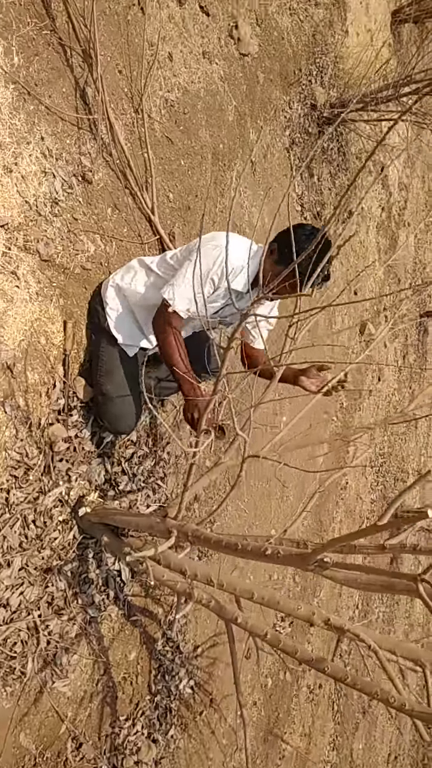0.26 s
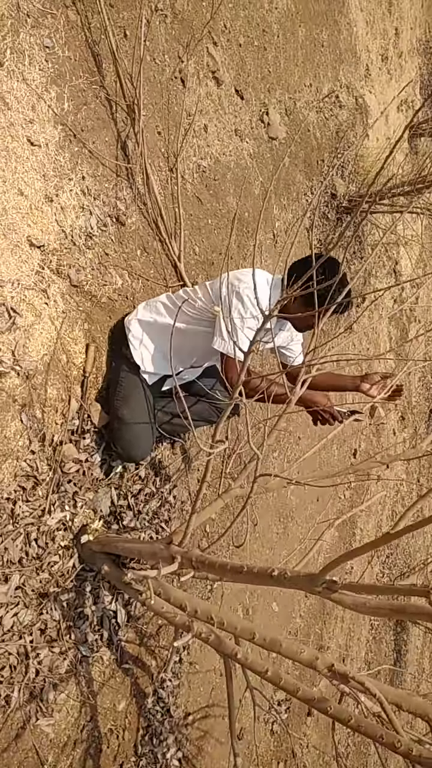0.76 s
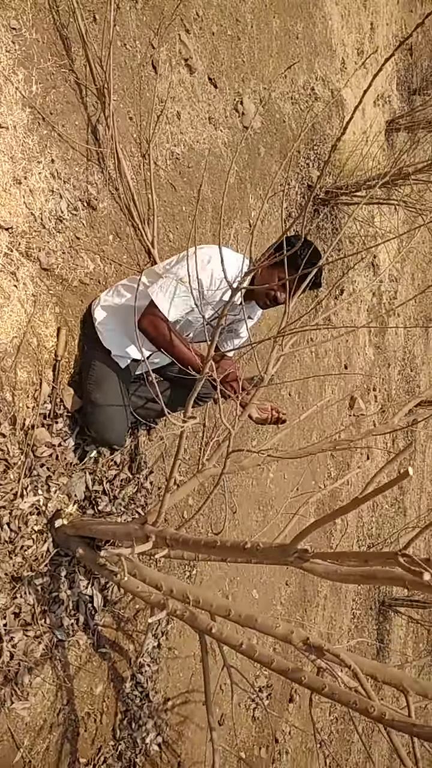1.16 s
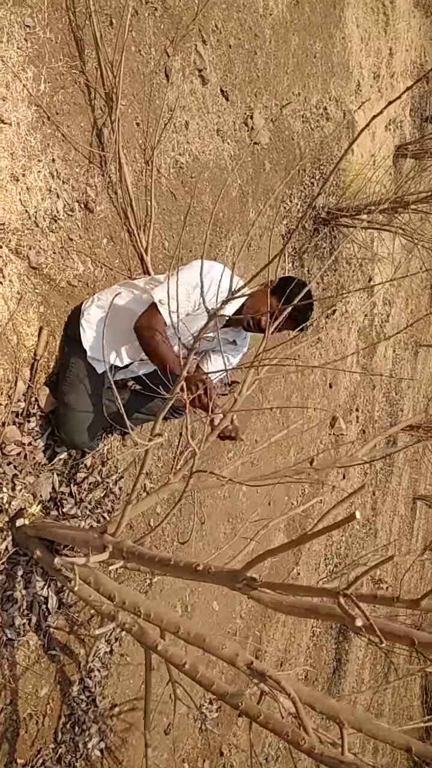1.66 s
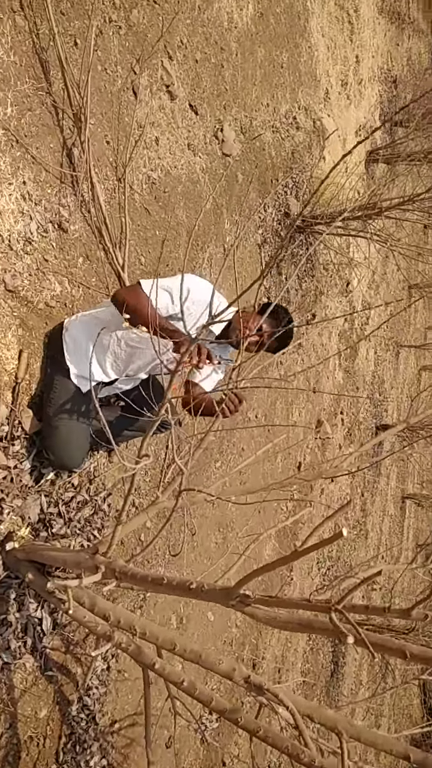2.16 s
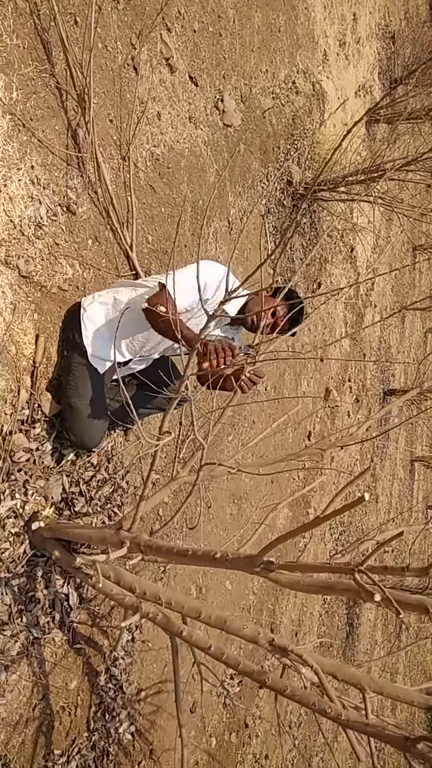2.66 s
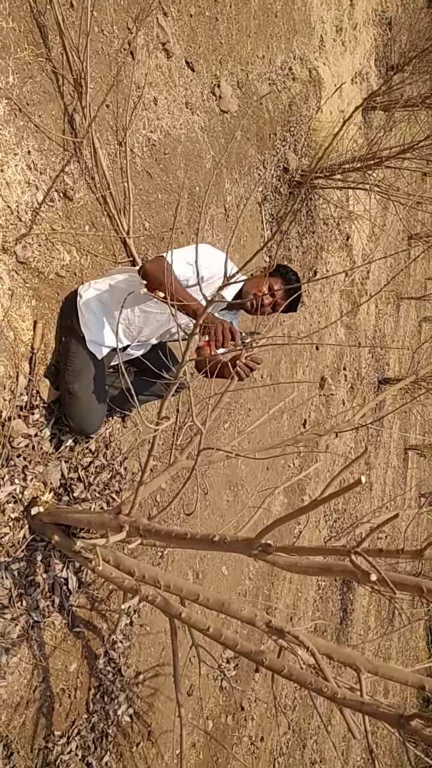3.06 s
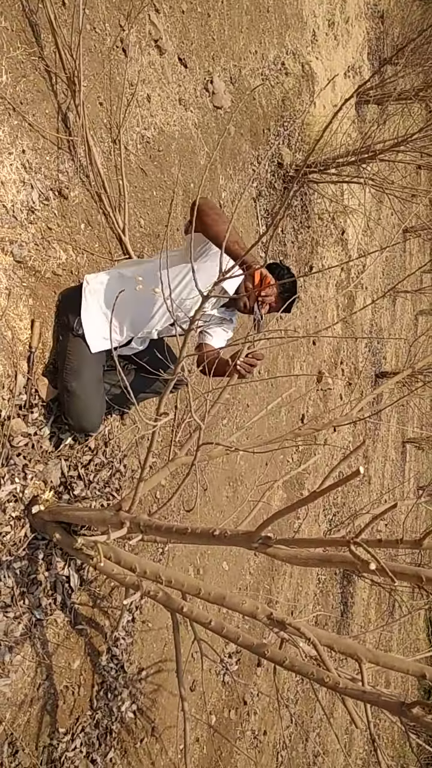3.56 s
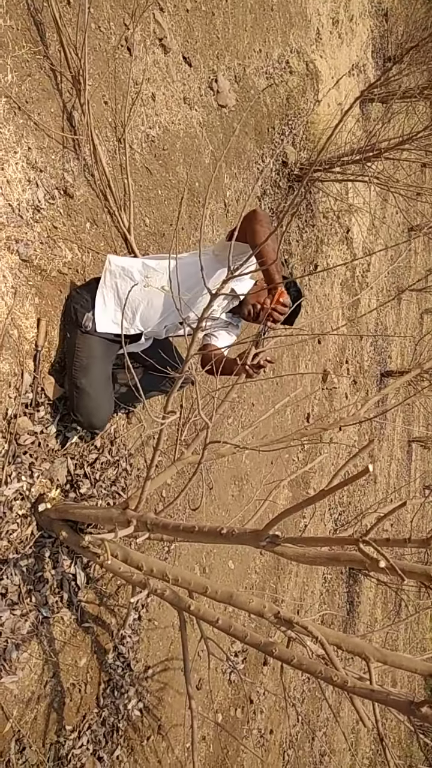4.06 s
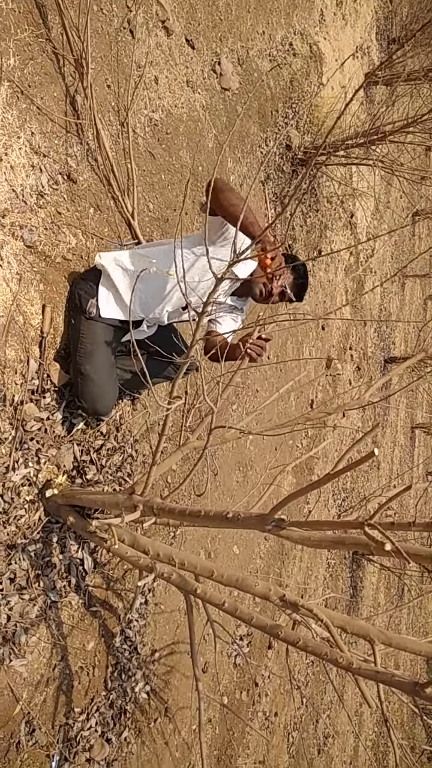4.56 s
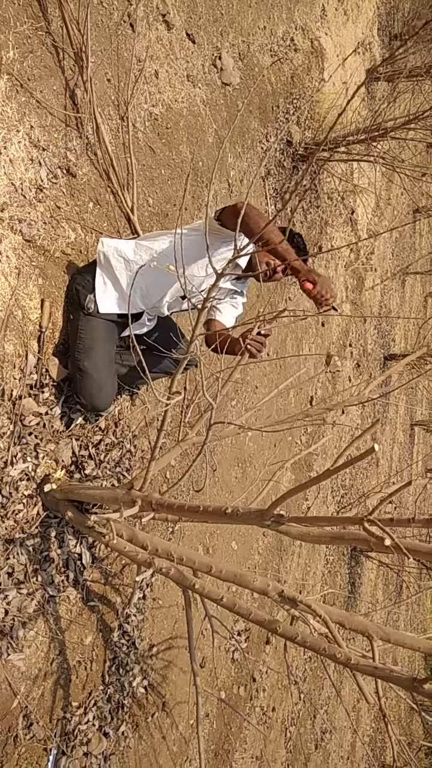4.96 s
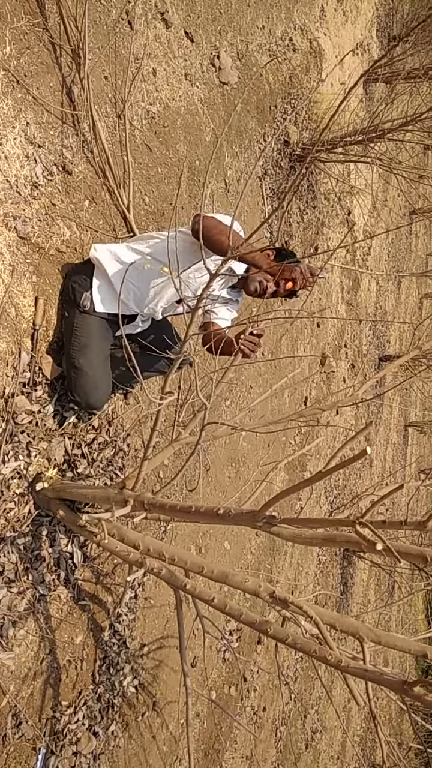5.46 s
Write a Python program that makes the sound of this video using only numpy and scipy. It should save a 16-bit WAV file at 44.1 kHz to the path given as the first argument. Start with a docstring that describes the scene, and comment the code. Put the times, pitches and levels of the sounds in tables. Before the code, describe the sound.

Close outdoor pruning: crisp woody clips with a metallic ring, brittle branch rustle and ticks, low wind buffeting mostly on the left.

```python
"""Pruning a bare tree in the wind

Hand shears snap through dry twigs of an orchard tree; shocks ring their modes and noise bursts crack the wood.
Shaken branches rustle as dense grains of noise, spread wide; twigs tick, wood knocks, a squeak glides up.
Wind buffets the two ports of a small microphone, mostly the left one: lumpy noise and puffs of a few cycles,
strong at first and then mostly single puffs, over a faint hiss of open air."""
import sys
import numpy as np
from scipy import signal
from scipy.fft import rfft, irfft
from scipy.io import wavfile
from scipy.ndimage import uniform_filter1d

SR = 44100
rng = np.random.default_rng(int(sys.argv[2]) if len(sys.argv) > 2 else 0)


def transcribe(u):
    """Save the signal u as a 16-bit wav file named by the first command-line argument.

    u: samples, shape (n,) or (channels, n), limited to [-1, 1]; the rate is SR.
    q: integer samples, one column per channel.
    """
    v = np.clip(np.atleast_2d(u).T, -1, 1)
    q = np.round(v * 32767).astype(np.int16)
    wavfile.write(sys.argv[1], SR, q)


N = 251811
RISE_S = 0.0003  # attack of a break or tick


def amp(db):
    """Amplitude of a level in dB."""
    return 10 ** (np.asarray(db) / 20)


def evened(x):
    """Scales x to unit RMS."""
    return x / np.sqrt(np.mean(x ** 2) + 1e-20)


def read(points, hz):
    """Reads a spectrum between its points on a logarithmic pitch scale."""
    f, value = np.transpose(points)
    return np.interp(np.log(hz + 1), np.log(f + 1), value)


def along(rows, t):
    """Glides each column of a table through the times in its first column."""
    s, *columns = np.transpose(rows)
    return [np.interp(t, s, c) for c in columns]


def add(mix, s, sound, early=0):
    """Adds a sound in place, its sample number `early` falling at s seconds."""
    start = round(s * SR) - early
    sound = sound[..., max(-start, 0):]
    part = mix[..., max(start, 0):][..., :sound.shape[-1]]
    part += sound[..., :part.shape[-1]]


def coloured(x, points):
    """Filters x by a spectrum in dB."""
    return irfft(rfft(x) * amp(read(points, np.fft.rfftfreq(len(x), 1 / SR))), len(x))


def lumps(size):
    """Slow chance of unit strength, changing over about size samples."""
    return evened(uniform_filter1d(uniform_filter1d(rng.standard_normal(N), size), size))


def peaked(t, s, db, rise_db_s, fall_db_s):
    """Power that climbs to a peak at s and falls away, both at a steady rate in dB."""
    return amp(db - np.maximum(rise_db_s * (s - t), fall_db_s * (t - s))) ** 2


def shares(left_over_right_db):
    """Gains of two unrelated ports whose mean power is 2, split by the level difference."""
    ratio = amp(left_over_right_db)
    return 2 * np.array([ratio, np.ones_like(ratio)]) / np.sqrt(1 + ratio ** 2)


# breeze under the puffs: time_s, level_db, left_over_right_db
BREEZE_COURSE = [(0.0, -25.5, 19.5), (0.57, -24, 28), (0.75, -29.5, 18), (0.86, -49, -13),
                 (1.02, -38, 41.5), (1.56, -63.5, -4), (1.65, -37, 37), (1.81, -49, -18),
                 (2.35, -58.5, -24), (2.42, -50, 11), (2.8, -58.5, -3), (2.86, -58, -42.5),
                 (3.01, -49.5, 11), (3.08, -68.5, -5), (4.07, -63, 31.5), (4.23, -67.5, -19.5),
                 (5.36, -57.5, 40), (5.71, -48, 14)]
# single puffs at the microphone: start_s, level_db, pitch_hz, left_over_right_db
WIND_PUFFS = [(0.026, -16, 258, 41), (0.092, -16.5, 198, 21), (0.127, -12.5, 266, 36),
              (0.218, -14, 276, 30), (0.289, -15, 246, 45), (0.325, -15, 172, 39), (0.345, -25.5, 273, 38),
              (0.39, -19.5, 240, 31), (0.445, -18.5, 312, 36), (0.492, -6.5, 212, 40),
              (0.525, -17, 211, 36), (0.549, -14.5, 197, 37), (0.567, -16, 268, 37), (0.613, -11, 310, 21),
              (0.631, -5, 233, 33), (0.711, -18, 225, 37), (0.824, -23, 147.5, 28), (0.909, -18, 169, 37),
              (1.003, -25.5, 139, 30), (1.07, -38, 140, 22), (1.117, -19.5, 146.6, 32),
              (1.156, -21.5, 171, 22), (1.206, -20.5, 152, 29), (1.234, -20.5, 188.3, 29),
              (1.36, -35, 149, 31), (1.66, -26.5, 155.5, 15.5), (1.872, -38.5, 153, -2),
              (2.281, -35, 190, -50), (2.317, -27, 165.3, -45.5), (2.616, -24.5, 178.7, 47),
              (2.684, -39.5, 167, 16), (2.709, -29, 150, 24), (2.844, -29, 157, -24), (2.85, -21, 190, -33),
              (2.97, -30, 138.7, 29), (3.696, -47, 167, 30), (3.756, -39, 150.8, 44),
              (3.936, -39, 124.8, 45.5), (4.023, -33.5, 158, 29.5), (4.05, -37, 143.7, 28),
              (4.332, -34.5, 153.9, -18.5), (4.716, -28, 137.7, -19.5), (4.919, -25.5, 170.4, 13),
              (4.943, -29, 139, 20), (4.986, -27.5, 151, 22), (5.217, -37, 151.7, 38.5),
              (5.431, -36.5, 154.5, 54.5), (5.568, -40, 150, 29.5), (5.634, -27, 151, 30)]
SWELL_DB, SWELL_LAW = -45, 0.94  # peak for a puff listed at -31 dB, dB gained per dB of puff
SWELL_RISE_DB_S, SWELL_FALL_DB_S = 650, 450


def gusting():
    """Turbulence gain at each port: the breeze plus a swell of power on the side of each puff."""
    t = np.arange(0, N + 64, 64) / SR
    level_db, side_db = along(BREEZE_COURSE, t)
    power = (amp(level_db) * shares(side_db)) ** 2
    for s, db, _, side_db in WIND_PUFFS:
        swell_db = SWELL_DB + SWELL_LAW * (db + 31.0)
        swell = peaked(t, s + 0.01, swell_db, SWELL_RISE_DB_S, SWELL_FALL_DB_S)
        power = power + shares(side_db)[:, None] ** 2 * swell
    return [np.interp(np.arange(N) / SR, t, np.sqrt(port)) for port in power]


SHARP, SHARP_PER_DB = 0.3, 0.06  # overtone against the one below for a puff listed at -22 dB; rise per dB


def puff_of_wind(db, hz, side_db):
    """A few wavering cycles of pressure; harder puffs have stronger overtones."""
    t = np.arange(3000) / SR
    attack = np.minimum(t / 0.0046, 1)
    shape = (2.16 * np.exp(-((t - 0.007) / 0.0055) ** 2) + 0.15 * np.exp(-t / 0.016)) * attack
    wobble = uniform_filter1d(rng.standard_normal((2, len(t))), size=120, axis=1)
    turn = 2 * np.pi * (hz * np.cumsum(1 + 1.4 * wobble, axis=1) / SR)
    # the wave crests near the height of the puff
    turn = turn - turn[:, [300]] + rng.normal(0, 0.5, (2, 1))
    sharp = np.clip(SHARP + SHARP_PER_DB * (db + 22), 0, 0.6)
    wave = sum(sharp ** k * np.exp(-k * t / 0.011) * np.cos((k + 1) * turn) for k in range(6))
    return amp(db - 9.5) * shares(side_db)[:, None] * rng.choice([-1, 1]) * shape * wave


# spectrum of strong wind at the microphone: pitch_hz, level_db
STRONG_WIND = [(12, -56.5), (20, -29), (59, -35), (141, 0), (213, -0.5), (360, -5), (630, -26), (755, -32),
               (1500, -58), (1950, -79)]
# spectrum of light wind at the microphone: pitch_hz, level_db
LIGHT_WIND = [(12, -39.5), (20, -28.5), (59, -12.5), (156, -2), (258, -15.5), (386, -39), (505, -72),
              (700, -77.5), (910, -103)]


def wind():
    """Lumpy turbulence, unrelated at each port and brighter when strong, with single puffs on top."""
    gain = gusting()
    out = np.zeros((2, N))
    for port in range(2):
        noise = rng.standard_normal(N)
        lumpy = gain[port] * amp(5.3 * lumps(size=260) - 4)
        strong = np.clip((20 * np.log10(lumpy) + 52) / 30, 0, 1)
        strong_noise = evened(coloured(noise, STRONG_WIND))
        light_noise = evened(coloured(noise, LIGHT_WIND))
        out[port] = lumpy * (strong * strong_noise + (1 - strong) * light_noise)
    for s, *row in WIND_PUFFS:
        add(out, s, puff_of_wind(*row))
    return out


AIR_DB = -84


def air():
    """Faint steady hiss of the open air above the bass, unlike at each port."""
    tone = [(300, -28), (600, -3.5), (3600, -5), (4700, 4.5), (9000, -19.5)]
    return amp(AIR_DB) * np.array([evened(coloured(port, tone)) for port in rng.standard_normal((2, N))])


# branches are shaken, swing up and settle: peak_s, hiss_level_db, scraping_level_db, build_up_s, hiss_t60_s
BRANCH_SHAKES = [(0.062, -28.5, -45.5, 0.048, 0.75), (0.233, -34, -41.5, 0.012, 0.38),
                 (0.374, -43, -54.5, 0.038, 1.1), (0.499, -48.5, -49.5, 0.17, 1.2),
                 (0.62, -46, -57, 0.063, 0.14), (0.94, -48, -61.5, 1, 0.42),
                 (0.98, -50.5, -54, 0.011, 0.78), (1.218, -47.5, -55, 0.5, 0.32),
                 (1.601, -58.5, -53.5, 0.34, 0.99), (1.69, -46.5, -57, 0.22, 0.29),
                 (1.73, -50, -58.5, 0.015, 0.93), (2.118, -47.5, -65, 0.011, 0.8),
                 (2.361, -50.5, -67, 0.027, 0.4), (2.547, -55, -75, 0.0064, 1.08),
                 (2.758, -46, -51, 0.0092, 0.51), (3.2, -37.5, -52, 0.025, 0.46),
                 (3.311, -36, -68, 0.0061, 0.88), (3.63, -47, -77.5, 0.0094, 0.27),
                 (3.871, -61.5, -84, 0.015, 1.3), (4.306, -58, -53.5, 0.012, 0.62),
                 (4.417, -59.5, -67.5, 0.008, 0.56), (5.04, -52, -59.5, 0.0087, 0.48),
                 (5.339, -66.5, -59, 0.014, 0.15), (5.501, -37.5, -47.5, 0.012, 0.22),
                 (5.41, -56, -68.5, 0.012, 0.74), (5.55, -56.5, -60, 0.023, 2), (5.7, -49, -84, 0.14, .5)]
BUILD_DB, SCRAPE_FADE = 23.5, 1.27  # growth over the build-up; scraping dies this much faster than hiss


def shaking():
    """Gains of hiss and scraping: all shakes of the branches add in power."""
    t, fine, coarse = np.arange(0, N + 128, 128) / SR, 0, 0
    for s, fine_db, coarse_db, build, t60 in BRANCH_SHAKES:
        rise, fall = BUILD_DB / max(build, 0.003), 60 / max(t60, 0.05)
        fine = fine + peaked(t, s, fine_db, rise, fall)
        coarse = coarse + peaked(t, s, coarse_db, rise, SCRAPE_FADE * fall)
    return [np.interp(np.arange(N) / SR, t, np.sqrt(power)) for power in (fine, coarse)]


# spectrum of the fine hiss of twigs: pitch_hz, level_db
TWIG_HISS = [(2060, -56.5), (3500, -19), (6920, -8), (7880, -5), (9570, -6.5), (11400, -3), (15700, -11),
             (16500, -28)]
# spectrum of the coarse scraping of branches: pitch_hz, level_db
BRANCH_SCRAPING = [(350, -37), (600, -6), (1020, -6), (1610, -0.5), (2640, -5), (3970, -10.5), (5000, -5),
                   (6500, -43), (11000, -120)]


def rustle():
    """Dense tiny twig contacts, in clumps and patches of colour, heard as fine hiss and coarse scraping."""
    fine_gain, coarse_gain = shaking()
    grain_gain = amp(2.6 * np.minimum(rng.exponential(1, (2, N)), 5))
    grains = rng.standard_normal((2, N)) * grain_gain
    clumps_db = 2.4 * lumps(size=40) + 2.2 * lumps(size=600)
    fine = evened(coloured(grains[0], TWIG_HISS) * amp(clumps_db))
    coarse = evened(coloured(grains[1], BRANCH_SCRAPING) * amp(0.21 * clumps_db))
    z = signal.stft(fine_gain * fine + coarse_gain * coarse, nperseg=256, noverlap=192)[2]
    # patches a few bands wide and some frames long
    patches = rng.standard_normal(z.shape[::-1]).T
    patches = evened(uniform_filter1d(uniform_filter1d(patches, size=3, axis=0), size=24, axis=1))
    return signal.istft(z * amp(3.3 * patches - 1.2), nperseg=256, noverlap=192)[1][:N]


# modes of the shears (handles under 4 kHz, blades up to 7 kHz, pivot above), before the grip acts:
# pitch_hz, level_db, t60_s
SHEAR_MODES = [(2140, -3, 0.018), (2800, -1, 0.03), (3110, -9, 0.016), (4980, -1, 0.022),
               (5377, -13, 0.025), (6400, -12.5, 0.02), (7980, -2, 0.015), (10000, 2, 0.026),
               (10880, -0.5, 0.018), (12900, -3.5, 0.015)]


def ringing(drive, handle_db, blade_db, pivot_db, loose):
    """Shocks drive the shears; the grip damps the modes; each pitch is raised slightly at random."""
    t, ring = np.arange(len(drive)) / SR, np.zeros(len(drive))
    for hz, db, t60 in SHEAR_MODES:
        part_db = handle_db if hz < 4000 else blade_db if hz < 7000 else pivot_db
        decay = amp(db + part_db - 60 * t / (loose * t60))
        mode = decay * np.sin(2 * np.pi * hz * rng.uniform(1.0, 1.015) * t)
        ring += signal.oaconvolve(drive, mode)[:len(t)]
    return ring


# twigs tick against each other or the shears:
# start_s, level_db, tone_at_2_khz_db (higher is duller), t60_s, shears_ring_db
TWIG_TICKS = [(0.045, -9, -32, 0.066, -32), (0.376, -27.5, -38, 0.043, 24), (0.4964, -21.5, -23, 0.18, 7),
              (0.569, -29.5, -7, 0.16, -24), (0.626, -25, -43, 0.049, -24), (0.9145, -32, -57, 0.02, -16),
              (1.221, -31.5, -37, 0.047, -7.5), (1.352, -40.5, -49, 0.036, -23),
              (1.697, -18.5, -9, 0.029, -41.5), (1.701, -20, -20, 0.03, -10),
              (1.8607, -33, -7.5, 0.038, 21), (2.098, -23.5, -30, 0.041, -18.5),
              (2.253, -37, -39, 0.05, -19.5), (2.361, -27, -26, 0.066, -9), (2.546, -28, -37, 0.035, -36.5),
              (2.898, -37, -1, 0.074, -17), (3.1247, -37, -14.5, 0.071, -22),
              (3.138, -37.5, 13, 0.041, -26), (3.1753, -8, -10.5, 0.02, -24),
              (3.287, -28, -8.5, 0.043, -10), (3.3073, -19, -21.5, 0.025, -23),
              (3.4825, -29, -32.5, 0.16, -20.5), (3.582, -28, -55, 0.026, -27),
              (3.6324, -29.5, -42, 0.026, -14), (4.4002, -31.5, 5, 0.06, -2),
              (4.4115, -20.5, -8, 0.039, -6), (4.4575, -38.5, -3, 0.12, -18), (4.507, -44, -4, 0.045, -15),
              (5.031, -27.5, 1, 0.069, -15), (5.139, -42.5, -3, 0.16, -5), (5.449, -45.5, -10, 0.055, 0),
              (5.644, -30.5, -4.5, 0.033, -20.5)]


def tick(db, dull_db, t60, ring_db):
    """A sharp snap with a short trail of twig noise, and shocks that ring the shears."""
    t = np.arange(3500) / SR
    noise, chatter = rng.standard_normal((2, len(t)))
    tone = [(500, dull_db - 27), (2000, dull_db), (5000, dull_db / 2), (10000, -2.0), (16000, -6.5)]
    snap = amp(-9.5 - 60 * t / 0.0084)
    trail = amp(-10.0 - 60 * t / np.clip(t60, 0.005, 0.2))
    shape = np.minimum(t / RISE_S, 1) * (snap + trail)
    shocks = 0.007 * chatter * np.exp(-t / 0.00009)
    ring = ringing(shocks, ring_db - 6.0, ring_db, ring_db - 11.5, loose=0.99)
    return amp(db) * (shape * evened(coloured(noise, tone)) + ring)


# the shears close on a twig: break_s, level_db, handle_ring_db, blade_ring_db, crack_db, break_ms,
# bite_ms (blade bites this early), grind_db, lead_in_db (crack noise swelling over a few ms before the break),
# loose (grip, factor on ring time), meet_ms (handles meet this late), meet_db (that second blow)
SHEAR_CUTS = [(0.048, -14, -51, -39, -15, 6.1, 8.1, -62.5, -22, 1.8, 5.2, -1),
              (0.2202, -19.5, -24, -30, 0.5, 17.4, 33, -20, -6, 1.4, 3.7, -1),
              (0.961, -10.5, -4, 0.5, 5, 1.42, 22, -51.5, -13.5, 1.19, 3.44, -9.5),
              (1.7151, -4.5, -24, -7, -4.5, 1.9, 9.4, -35.5, -19, 0.8, 4, -13),
              (2.0754, -20.5, -37, -38, -26, 33, 7.3, -22, -18, 1.1, 3.4, 4.5),
              (2.1087, -19, -29, -18, -10, 2.7, 16, -29, -22.5, 1.1, 1.8, -14.5),
              (2.7373, -11, -13.5, -3, 4, 6.4, 32, -30.5, -20, 0.97, 3.4, -18),
              (3.1620, -11, -17.5, -3.5, -8, 30, 38, -48, -13, 0.16, 4.2, 7.5),
              (4.289, -16.5, 1, 4, 7, 2.55, 83.5, -53.5, -14.5, 0.85, 3.73, -8),
              (5.0114, -19, 1, -15.5, 6.5, 6, 56.3, -30, -18, 0.57, 4, -11.5),
              (5.4799, -18.5, 0, 1.5, 10, 4.4, 83, -35.5, -14.5, 1.8, 3.97, 4)]
# spectrum of cracking wood: pitch_hz, level_db
WOOD_CRACK = [(180, -45.5), (300, -20), (1020, -33), (2100, -11), (3900, -8), (5020, 5), (6100, -5),
              (9980, 1), (15200, -3.5), (16500, -21.5)]
# spectrum of the blade working into wood: pitch_hz, level_db
BLADE_GRIND = [(350, -62), (600, -33), (1610, -6.5), (2340, -19.5), (2800, -7), (5870, -5.5), (13900, 4.5),
               (16000, -9)]
LEAD = 3200  # samples of a cut before the break; earlier grinding is left out


def cut(db, handle_db, blade_db, crack_db, break_ms, bite_ms, grind_db, lead_in_db, loose, meet_ms, meet_db):
    """The blade grinds into the twig, fibres break in a quick run of shocks, splinters trail off."""
    t = np.arange(-LEAD, 5000) / SR
    after = np.maximum(t, 0)
    noise, chatter, grit, slips = rng.standard_normal((4, len(t)))

    through = after * 1000 / max(break_ms, 1)  # how far the break has run
    fibres = amp(2.1 * evened(uniform_filter1d(slips, size=60)))
    breaking = np.minimum(after / RISE_S, 1) * np.exp(-through) / (1 + through ** 6) * fibres
    gritty_db = 4.5 * evened(uniform_filter1d(slips, size=120)) - 3
    splinters = amp(-26.5 + gritty_db - 60 * after / 0.29) * (t >= 0)
    late = t - meet_ms / 1000
    first_blow = np.exp(-after / 0.0009) * (t >= 0)
    second_blow = amp(meet_db) * np.exp(-np.maximum(late, 0) / 0.0012) * (late >= 0)
    snap = 1.2 * (first_blow + second_blow)
    lead_in = amp(lead_in_db) * np.exp(np.minimum(t, 0) / 0.004) * (t < 0)
    wood = evened(coloured(noise * amp(1.3 * chatter ** 2), WOOD_CRACK))
    crack = amp(crack_db) * wood * (snap + breaking + splinters + lead_in)

    # light pressure is dull
    pressed = coloured(coloured(grit, BLADE_GRIND), [(4000, 0.0017), (8000, min(1.5 * (grind_db + 27), 0))])
    since_bite = t + bite_ms / 1000
    slips_db = gritty_db + 8 * since_bite / (bite_ms / 1000)
    biting = np.clip(since_bite / 0.0095, 0, 1) * (t < 0)
    grinding = amp(grind_db + slips_db) * biting * evened(pressed)

    # the slipping blade keeps the shears ringing
    singing = ringing(0.045 * grinding, -1.0, 0.0, -30, loose=1.4)
    # blades meet, fibres chatter
    blow = 0.5 * np.exp(-(t / 0.00002) ** 2) + 0.046 * chatter * (breaking + snap)
    ring = ringing(blow, handle_db, blade_db, -4.0, max(loose, 0.2))
    whole = crack + 0.7 * grinding + singing + ring
    # small parts radiate no bass
    return amp(db) * signal.sosfilt(signal.butter(3, 1200, "high", fs=SR, output="sos"), whole)


# the shears knock softly against wood: start_s, level_db, wood_pitch_hz, handle_ring_db
WOOD_KNOCKS = [(0.626, -29, 946, -28), (1.469, -42.5, 1335, -14), (1.7153, -28, 1380, -17.5),
               (1.774, -41.5, 1315, -23), (2.077, -26, 1097, -31), (4.219, -57, 1937, -3),
               (4.277, -36, 1590, -2), (4.403, -36.5, 1400, -20), (4.412, -34.5, 1275, -13.5),
               (4.884, -41, 1947, -3.5), (4.971, -40, 1750, 17), (5.333, -55.5, 1355, -10),
               (5.368, -44.5, 1300, -7), (5.41, -50.5, 2000, 12.5)]


def knock(db, hz, handle_db):
    """A rough dull tap on wood, noise gathered at its pitch, that also rings the handles."""
    t = np.arange(2500) / SR
    noise, chatter = rng.standard_normal((2, len(t)))
    tone = [(hz / 3, -28), (0.7 * hz, -10), (hz, 0), (1.5 * hz, -11),
            (4200, -20), (5200, -12), (6500, -40)]
    tap = evened(coloured(noise, tone)) * amp(-60 * t / 0.03) * np.minimum(t / 0.00021, 1)
    shocks = 0.18 * chatter * np.exp(-t / 0.00023)
    ring = ringing(shocks, handle_db, handle_db - 12.0, -61, loose=2.0)
    return amp(db - 8.0) * (tap + ring)


# a thin rising squeak: time_s, pitch_hz, level_db
RISING_SQUEAK = [(5.28, 4860, -75), (5.306, 5150, -55.5), (5.345, 5330, -68.5), (5.385, 6270, -71.5)]


def squeak():
    """A thin whistle, one sine of wavering pitch that glides up."""
    t = np.arange(RISING_SQUEAK[0][0], RISING_SQUEAK[-1][0], 1 / SR)
    hz, db = along(RISING_SQUEAK, t)
    waver = 1 + 0.1 * uniform_filter1d(rng.standard_normal(len(t)), size=80)
    whistle = np.sin(2 * np.pi * np.cumsum(hz * waver) / SR)
    return np.sqrt(2) * amp(db) * whistle * signal.windows.tukey(len(t), 0.2)


def scattered(x):
    """A short noise echo, unlike at each port, fading from one random pattern to the next."""
    size, out = 16384, np.zeros_like(x)
    padded = np.pad(x, ((0, 0), (size // 2, size)))
    fade = signal.windows.hann(size, sym=False)
    for start in range(0, N + size // 2, size // 2):
        echo = rng.standard_normal((2, 1500)) * amp(-60 * np.arange(1500) / SR / 0.02)
        echo = echo / np.linalg.norm(echo[0])
        piece = signal.fftconvolve(padded[:, start:start + size] * fade, echo, axes=1)
        add(out, start / SR, piece, early=size // 2)
    return out


# colour between the two ports of the microphone: pitch_hz, left_over_right_db
PORT_TILT = [(60, 1), (110, 15), (200, -6.5), (380, -1), (700, -0.5), (1290, 7.5), (2380, -3), (4400, 5),
             (8120, 0), (15000, 8.5)]
# the microphone turns: time_s, left_lag_ms
PORT_LAG = [(0, 0.027), (1.5, 0.015), (2, 0.06), (3.5, 0.084), (5.7, .11)]


def ports(x, echo_db):
    """Sound reaches the left port later and coloured, with a little scatter."""
    hz, t, z = signal.stft(x, SR, nperseg=256, noverlap=192)
    tilt = amp(read(PORT_TILT, hz)[:, None] / 2)  # half at each port
    delay = np.exp(-2j * np.pi * hz[:, None] * along(PORT_LAG, t)[0] / 1000)
    pair = np.array([z * tilt * delay, z / tilt])
    both = signal.istft(pair, SR, nperseg=256, noverlap=192)[1][:, :N]
    return both + amp(echo_db) * scattered(both)


def scene():
    """Shears, twigs and branches at the ports, a softer wide rustle, wind and air over all."""
    near = rustle()
    # the same rustle more softly, drawn separately for each port, for width
    wide = amp(-13) * np.array([rustle(), rustle()])
    for s, *row in SHEAR_CUTS:
        add(near, s, cut(*row), early=LEAD)
    for play, table in (tick, TWIG_TICKS), (knock, WOOD_KNOCKS):
        for s, *row in table:
            add(near, s, play(*row))
    add(near, RISING_SQUEAK[0][0], squeak())
    return ports(near, echo_db=-6.5) + wide + wind() + air()


EDGE_HZ = 15900  # upper band limit of the recorder


def record(dry):
    """A wind filter trims the bass, peaks overload softly, then the band limit."""
    trimmed = signal.sosfilt(signal.butter(3, 70, "high", fs=SR, output="sos"), dry)
    soft = 0.82 * np.tanh(trimmed / 0.82)
    band = signal.firwin(255, EDGE_HZ, window=("kaiser", 12), fs=SR)
    return signal.oaconvolve(soft, band[None], "same")


dry = scene()
out = record(dry)
transcribe(out)
```